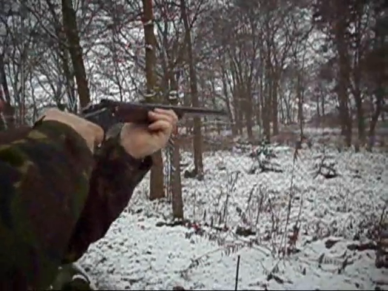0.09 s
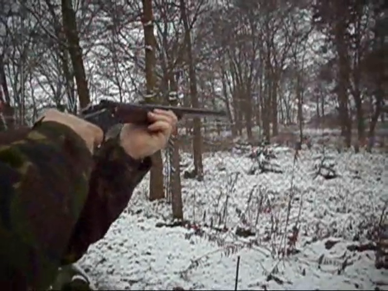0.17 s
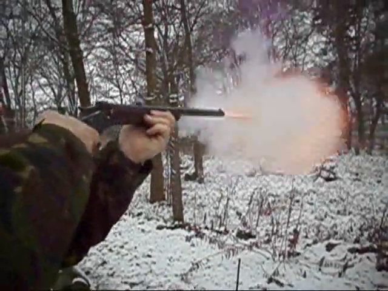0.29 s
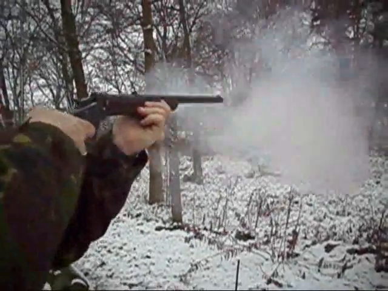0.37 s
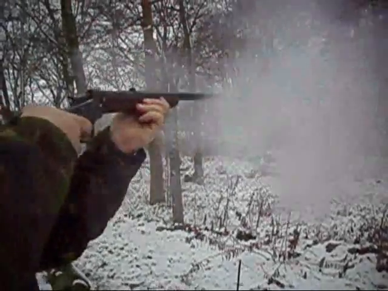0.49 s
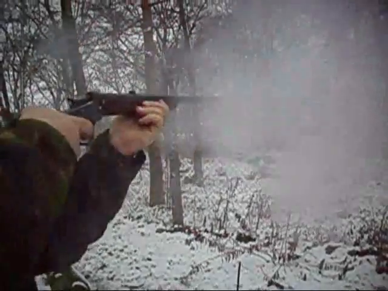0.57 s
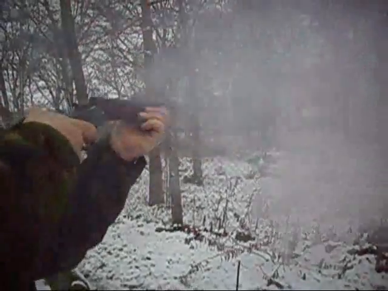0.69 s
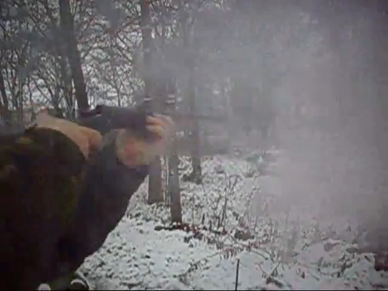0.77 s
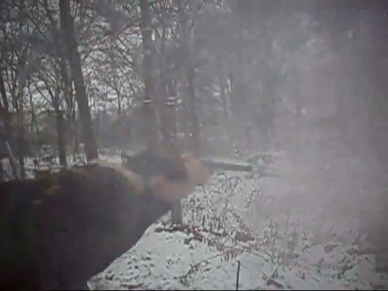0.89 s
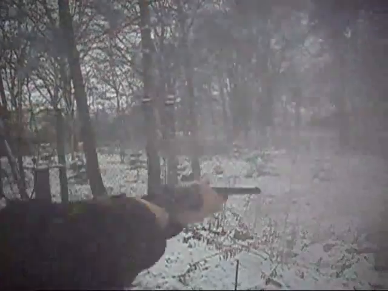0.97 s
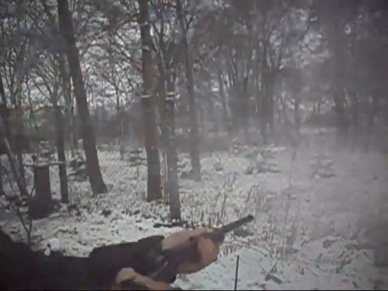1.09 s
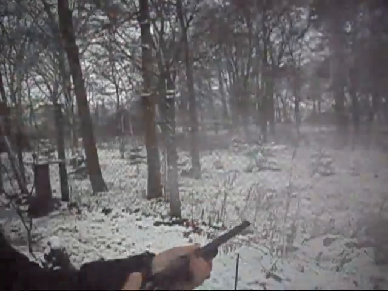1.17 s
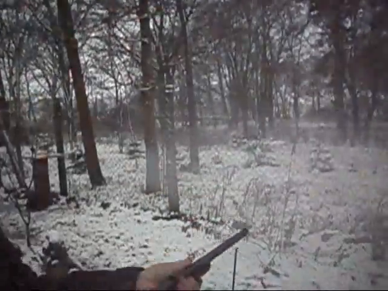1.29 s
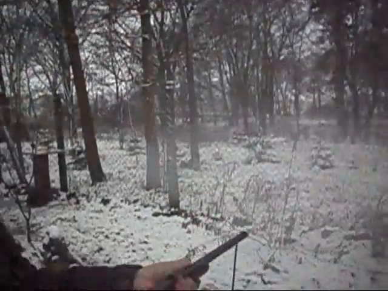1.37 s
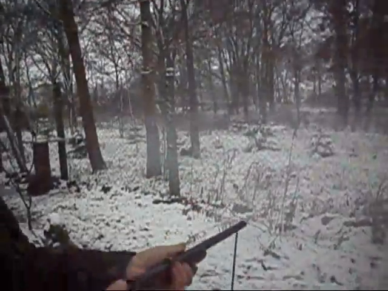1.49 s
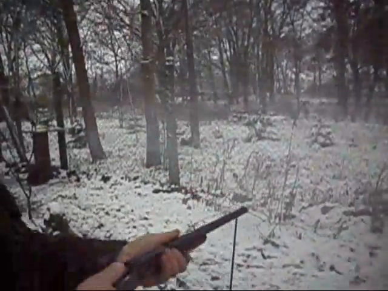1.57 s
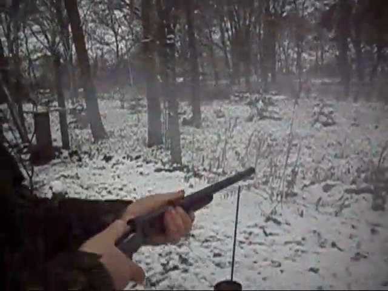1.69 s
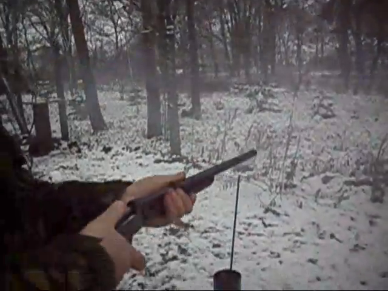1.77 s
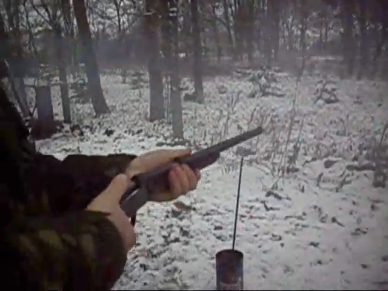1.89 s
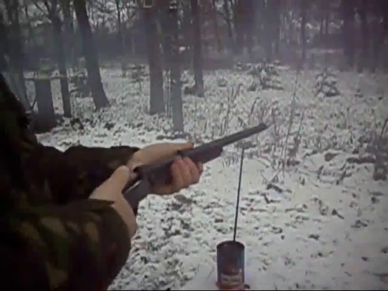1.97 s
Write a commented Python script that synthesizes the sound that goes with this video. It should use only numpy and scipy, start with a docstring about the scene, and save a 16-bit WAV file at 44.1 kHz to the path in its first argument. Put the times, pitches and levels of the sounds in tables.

```python
"""Rifle shot in snowy woodland

One shot, heard on a small camera beside the shooter. The blast chokes the microphone, which
sputters, then overloads on the echoes from the near trunks; the far woods roll on. Wind and
handling bump the microphone; the recorder clips, and its coarse sampling adds a gritty treble."""
import sys
import numpy as np
from scipy import signal
from scipy.fft import rfft, irfft
from scipy.io import wavfile
from scipy.ndimage import uniform_filter1d, minimum_filter1d

SR = 44100
rng = np.random.default_rng(int(sys.argv[2]) if len(sys.argv) > 2 else 0)


def to_wav(s):
    """Save 16-bit WAV."""
    ch = np.atleast_2d(s).T  # columns
    pcm = np.round(np.clip(ch, -1, 1) * 32767)  # PCM
    wavfile.write(sys.argv[1], SR, pcm.astype(np.int16))


N = 90405
TIME_S = np.arange(N) / SR
FREQ_HZ = np.fft.rfftfreq(N, 1 / SR)
SHOT_S = 0.302


def amp(db):
    """Decibels to gain."""
    return 10 ** (np.asarray(db) / 20)


def unit_rms(x):
    """Scales to rms 1."""
    return x / np.sqrt(np.mean(x ** 2) + 1e-20)


def at_freq(table, hz):
    """Reads a table on a log-frequency axis."""
    freqs, values = np.transpose(table)
    return np.interp(np.log(hz + 1), np.log(freqs + 1), values)


def envelope(levels):
    """Gain at every sample from a table of times and decibels."""
    return amp(np.interp(TIME_S, *np.transpose(levels)))


def noise(colour):
    """Noise of rms 1 with the given spectrum and nothing above its last point."""
    gain = amp(at_freq(colour, FREQ_HZ)) * (FREQ_HZ < colour[-1][0])
    return unit_rms(irfft(rfft(rng.standard_normal(N)) * gain, N))


# Spectrum of the crack, right beside the rifle: freq_hz, level_db
CRACK_COLOUR = [(40, -10), (150, -4), (500, 0), (1000, 0), (2000, -1.5), (3000, -4), (3900, -9),
                (5000, -24)]
# Spectrum of an echo from far off: freq_hz, level_db
DULL_COLOUR = [(40, 2), (300, -10), (600, 7), (1100, -1), (2000, -2), (3000, -9.5), (3700, -6), (4500, -40)]
# Distinct echoes from trunks and the edges of the wood: start_s, level_db, decay_s
TRUNK_ECHOES = [(0.3122, -3, 0.0091), (0.3279, 0, 0.0044), (0.3524, 8.5, 0.012), (0.362, -2, 0.0071),
                (0.385, 2.5, 0.012), (0.5631, 14, 0.0018), (0.6274, 8, 0.0014), (.683, -46, .006),
                (.752, -18, 0.012), (0.774, -23, 0.0092), (0.889, -16, 0.0028), (0.911, -22, 0.0033),
                (1.038, -26, 0.012), (1.054, -32, 0.0038), (1.181, -29, 0.012), (1.254, -25, 0.0058)]

def rifle_shot():
    """The hammer's tick, the muzzle blast and its distinct echoes, duller the farther they travel."""
    hammer_lead_s, blast_hold_s, blast_decay_s = 0.0028, 0.0031, 0.0048
    echo_rise_s, dulling_s = 0.00039, 0.6
    t = TIME_S - SHOT_S
    hammer = amp(-21) * (t > -hammer_lead_s) * (t < 0)
    blast = amp(19) * (t >= 0) * np.exp(-np.maximum(t - blast_hold_s, 0) / blast_decay_s)
    power = hammer ** 2 + blast ** 2
    for start_s, level_db, decay_s in TRUNK_ECHOES:
        age = np.maximum(TIME_S - start_s, 0)
        echo = amp(level_db) * np.minimum(age / echo_rise_s, 1) * np.exp(-age / decay_s)
        power += echo ** 2
    bright_share = np.exp(-(t / dulling_s) ** 2)
    crack = np.sqrt(power * bright_share) * noise(CRACK_COLOUR)
    dull = np.sqrt(power * (1 - bright_share)) * noise(DULL_COLOUR)
    return crack + dull


def echo_clumps(depth_db=2.5, cutoff_hz=91, settle_s=0.86):
    """A fluttering gain: echoes arrive in random clumps that even out with time."""
    wander = unit_rms(irfft(rfft(rng.standard_normal(N)) / (1 + (FREQ_HZ / cutoff_hz) ** 4), N))
    settling = np.exp(-np.maximum(TIME_S - SHOT_S, 0) / settle_s)
    return amp(depth_db * settling * wander)


# Spectrum of the scatter from the trunks around the shooter: freq_hz, level_db
SCATTER_COLOUR = [(30, 2), (80, -3), (150, 3), (350, -4), (1000, 0), (2000, -2), (3000, 0.5), (3900, -0.5),
                  (5000, -32.5)]
# Level of that scatter at the microphone: time_s, level_db
SCATTER_LEVEL = [(.302, -3.5), (0.409, -2), (.465, 1), (.525, -3.5), (0.546, -13.5), (0.632, -22.5),
                 (0.682, -22.5), (1.0, -46), (2.05, -92)]

def near_trunks():
    """Bright scatter swells as the blast reaches more trunks, then drops past the edge of the stand."""
    return envelope(SCATTER_LEVEL) * (TIME_S > SHOT_S) * echo_clumps() * noise(SCATTER_COLOUR)


# Spectrum of the roll from the distant woods: freq_hz, level_db
ROLL_COLOUR = [(40, -1.5), (100, -7.5), (180, -17.5), (280, -2), (400, -5.5), (560, 0.5), (1100, -0.5),
               (1400, -10.5), (2000, -11.5), (2900, -16.5), (3900, -25), (5000, -43)]
# Time the roll takes to fall by 60 dB: freq_hz, t60_s
ROLL_DECAY = [(100, 2.56), (250, 1.84), (600, 2.47), (1100, 2.515), (2000, 2.12), (4000, 2.17)]
# Far groves that throw the roll back more strongly: centre_s, gain_db, width_s
GROVE_SURGES = [(.622, 2.5, 0.033), (1.05, 0, 0.013), (1.94, 4, 0.057)]

def far_woods(level_db=-8, peak_s=0.56, rise_s=0.28):
    """A hollow roll returns from the distance, each band dying at its own speed."""
    hz, frame_s, bands = signal.stft(noise(ROLL_COLOUR), SR, nperseg=1024)
    fade = amp(-60 * np.maximum(frame_s - peak_s, 0) / at_freq(ROLL_DECAY, hz)[:, None])
    roll = signal.istft(bands * fade, SR, nperseg=1024)[1][:N]
    swell = np.exp(np.minimum(TIME_S - peak_s, 0) / rise_s) * (TIME_S > SHOT_S)
    surges_db = sum(gain_db * np.exp(-((TIME_S - centre_s) / width_s) ** 2)
                    for centre_s, gain_db, width_s in GROVE_SURGES)
    return amp(level_db + surges_db) * swell * echo_clumps() * roll


# Spectrum of the report's bass: freq_hz, level_db
BASS_COLOUR = [(30, -1.5), (55, 0), (80, 1.5), (105, 2), (135, -13), (165, -10), (260, -5.5), (400, -17),
               (700, -83)]
# Level of that bass where the shooter stands: time_s, level_db
BASS_LEVEL = [(.302, -32), (0.451, -23), (0.517, -7), (.58, -17), (.63, -13.5), (.75, -19), (1.048, -35.5),
              (1.15, -35), (2.05, -46.5)]

def boom():
    """The bass of the report builds up and rumbles away."""
    return envelope(BASS_LEVEL) * (TIME_S > SHOT_S) * noise(BASS_COLOUR)


# Bumps on the camera body as the shooter moves: centre_s, level_db, width_s, pitch_hz, contact_s
CAMERA_BUMPS = [(.2368, -11, 0.0096, 45, 0.0012), (.254, -22, .004, 91, 0.0013),
                (.845, -18.5, 0.012, 66, 0.0011), (1.63, -20, .016, 39.6, 0.0024)]

def handling_bumps():
    """Soft low thuds: a brief contact inside a cycle or two of sway."""
    thuds = np.zeros(N)
    for centre_s, level_db, width_s, pitch_hz, contact_s in CAMERA_BUMPS:
        t = TIME_S - centre_s
        sway = np.exp(-np.hypot(t, width_s) / width_s) * np.cos(2 * np.pi * pitch_hz * t)
        knock = np.exp(-(t / contact_s) ** 2)
        thuds -= amp(level_db) * (2 * sway + amp(1) * knock)
    return thuds


# Spectrum of the wind right on the microphone: freq_hz, level_db
WIND_COLOUR = [(10, -7.5), (25, 0), (55, -7), (90, -15), (160, -15.5), (300, -25), (600, -58), (2000, -82)]
# Its slow rise and fall: time_s, level_db
GUST_LEVEL = [(0, -36.5), (.2, -31), (.5, -27), (.9, -33.5), (1.5, -32.5), (2.05, -31)]

def wind():
    """Moving air buffets the microphone with a low rumble."""
    return envelope(GUST_LEVEL) * noise(WIND_COLOUR)


# Spectrum of the hiss at the camera's position: freq_hz, level_db
HISS_COLOUR = [(50, 0), (300, -3), (800, -5), (2000, -8), (3200, -10), (4000, -12.5), (5000, -24)]

def hiss(level_db=-49):
    """A faint, steady hiss lies under everything."""
    return amp(level_db) * noise(HISS_COLOUR)


# Tones from the camera itself, close to its microphone: pitch_hz, level_db
WHINE_TONES = [(813, -53.5), (1626, -64.5)]

def camera_whine():
    """The camera gives off a thin, steady tone and its octave."""
    return sum(amp(level_db) * np.sqrt(2) * np.sin(2 * np.pi * pitch_hz * TIME_S)
               for pitch_hz, level_db in WHINE_TONES)


def scene():
    """The shot and the woods' answer over the quiet background, in mono."""
    report = rifle_shot() + near_trunks() + far_woods() + boom()
    return (report + handling_bumps() + wind() + hiss() + camera_whine())[None]


# Share of the time (0-1) that the microphone responds just after the blast: time_s, open_share
MIC_RESPONSE = [(0.301, 1), (0.306, 0.14), (0.309, 0.1), (.322, .1), (0.331, 0.24), (.336, 0.03),
                (0.349, 0), (0.351, 0.1), (0.36, 0), (0.364, 0.5), (0.384, 0.1), (.389, .38), (0.403, .12),
                (0.414, 0.7), (0.441, .95)]

def choked_microphone(sound, leak_db=-17.5):
    """While the microphone is choked, the strongest peaks break through and the rest only leaks."""
    open_share = np.interp(TIME_S, *np.transpose(MIC_RESPONSE), left=1, right=1)
    peaks = -minimum_filter1d(-abs(sound), size=7)
    # Rank each peak, 0-1, among its neighbours about 3 ms to either side.
    rank = np.mean([peaks >= np.roll(peaks, lag) for lag in range(-150, 151, 6)], axis=0)
    is_open = (rank > 1 - open_share) & (open_share > 0.015)
    gate = uniform_filter1d(is_open.astype(float), size=3)
    return sound * np.maximum(gate, amp(leak_db))


def record(dry):
    """The microphone chokes; the recorder clips, holds each coarse sample and limits the band."""
    ceiling, hold_hz, cutoff_hz = 0.9, 8003, 15600
    clipped = np.clip(choked_microphone(dry[0]), -ceiling, ceiling)
    held = np.interp(np.floor(TIME_S * hold_hz) / hold_hz, TIME_S, clipped)
    lowpass = signal.firwin(511, cutoff_hz, window=("kaiser", 7), fs=SR)
    return signal.oaconvolve(held, lowpass, "same")[None]


dry = scene()
out = record(dry)
to_wav(out)
```